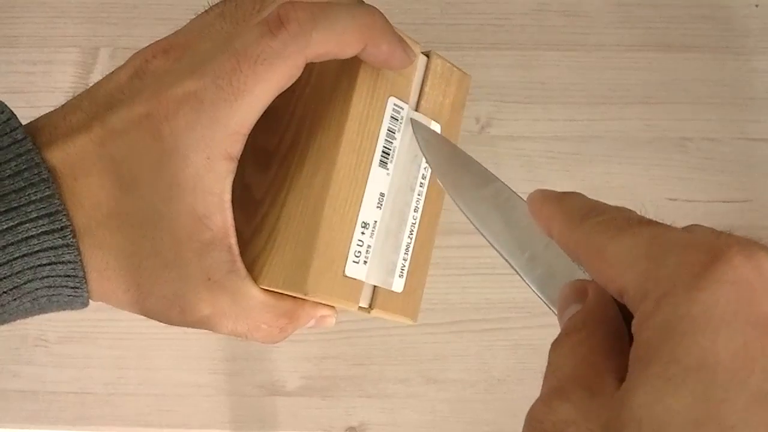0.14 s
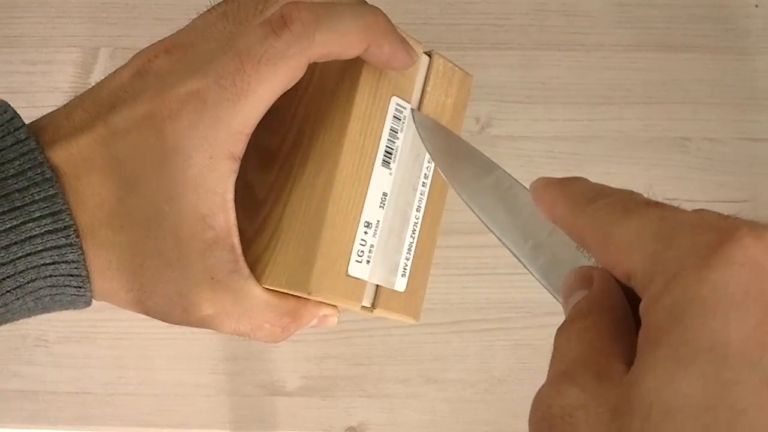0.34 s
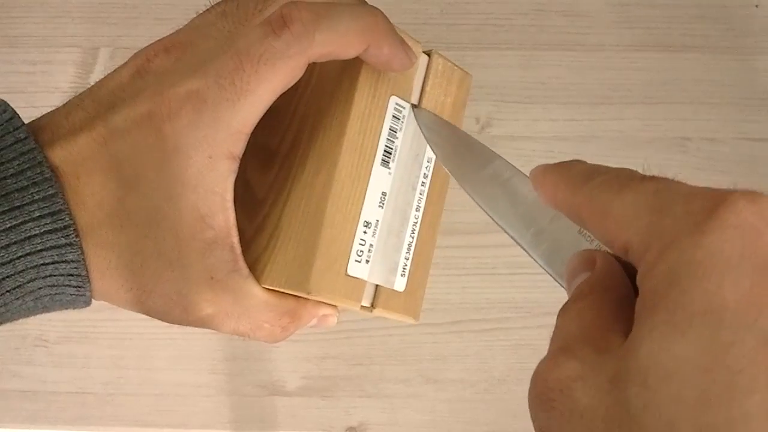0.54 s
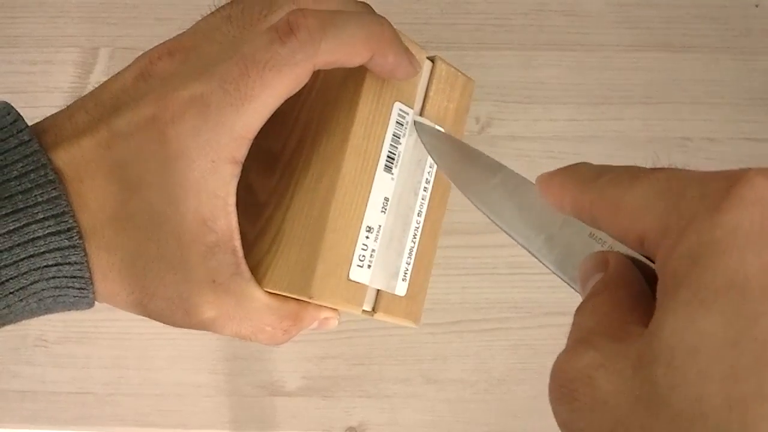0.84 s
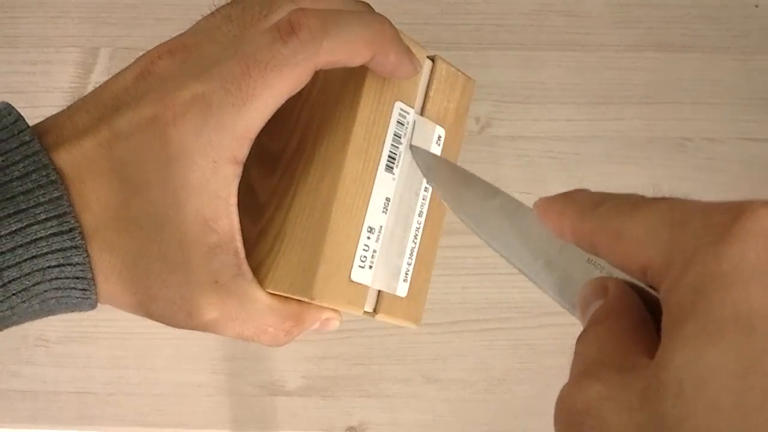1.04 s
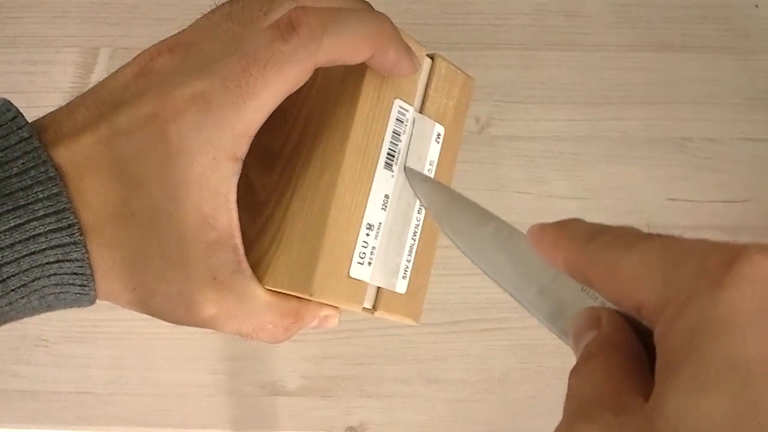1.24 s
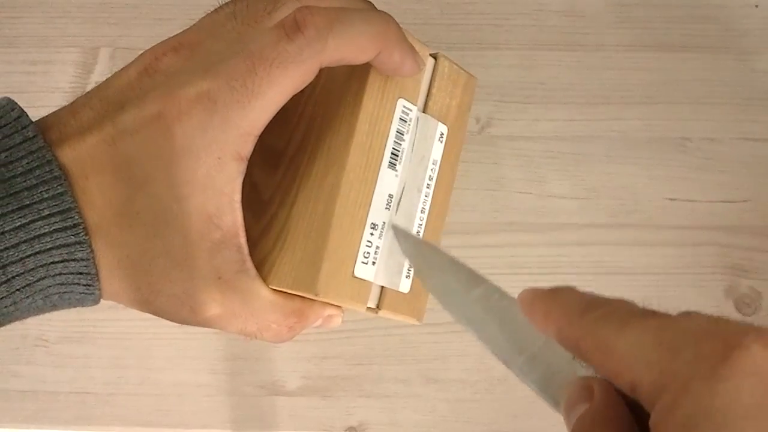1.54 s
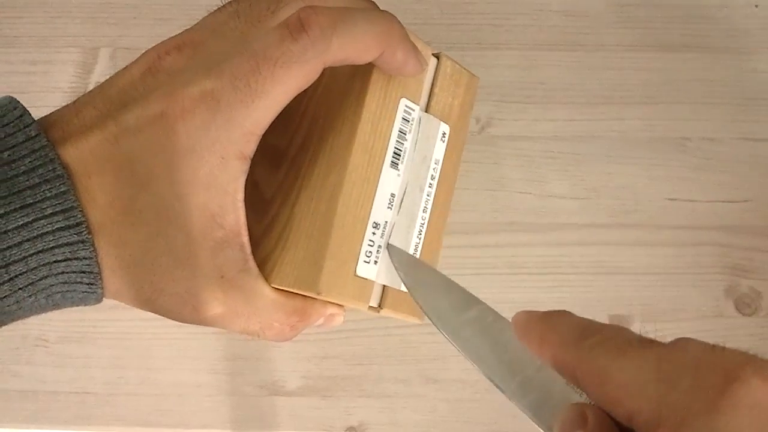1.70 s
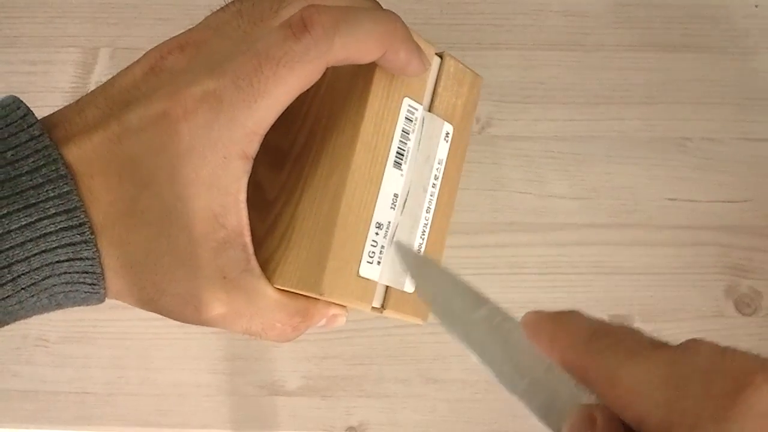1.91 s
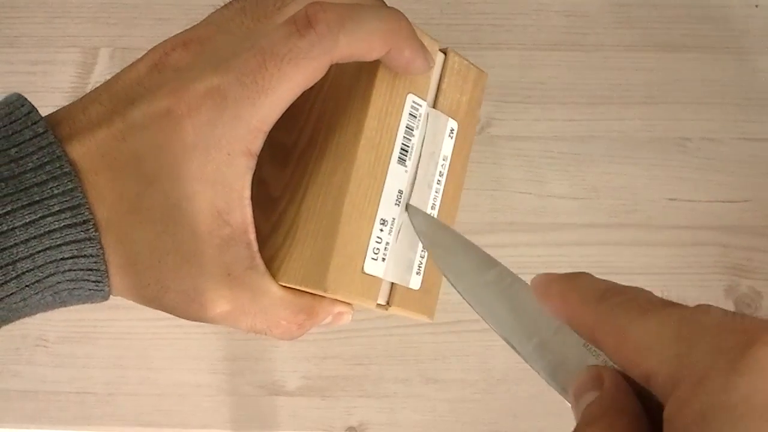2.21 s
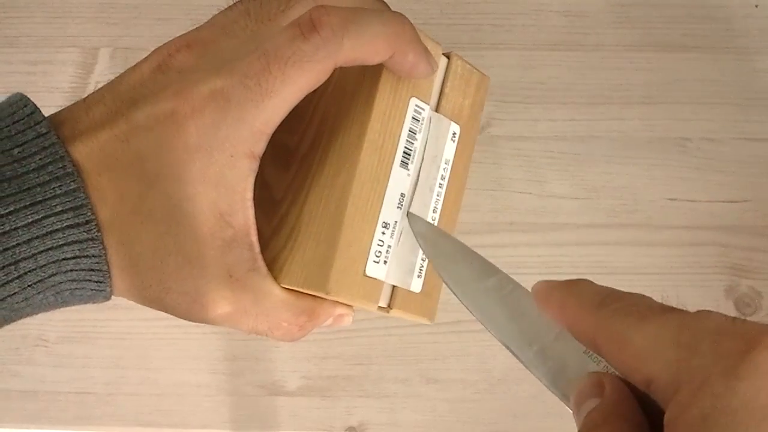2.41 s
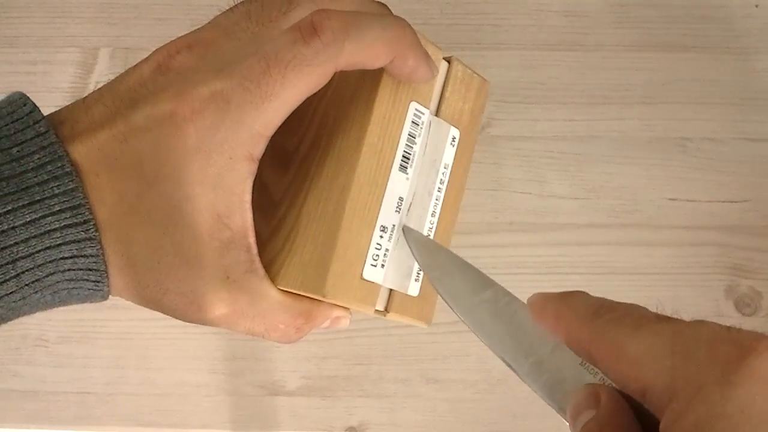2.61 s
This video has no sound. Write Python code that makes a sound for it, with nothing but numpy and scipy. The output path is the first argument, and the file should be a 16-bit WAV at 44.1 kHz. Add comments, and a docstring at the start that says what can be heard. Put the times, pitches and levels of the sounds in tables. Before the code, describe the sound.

A knife cuts the paper seal of a small cardboard box. Its tip ticks sharply near 0.3 and 0.7 seconds, pierces at 0.9, then slits the seam with a fibrous rasp until 1.6, as the box thuds and rumbles on the table. From 1.7 come short scratches and a flap's rustle, with last ticks and thuds near 2.3 and 2.6. A low hum runs steadily in the small room.

```python
"""The tip of a kitchen knife ticks against the paper seal of a small cardboard box, catching and snapping free.
Near 0.9 s it pierces the seal, then slits the seam in a rasp of tearing fibres, while the hand-held
box thuds and rumbles on the table. From 1.7 s come short scratches, the rustle of the loosened flap
and a few last ticks and thuds. A small room answers the blade, over a steady low hum."""
import sys
import numpy as np
from scipy import signal
from scipy.fft import rfft, irfft, next_fast_len
from scipy.io import wavfile
from scipy.ndimage import map_coordinates

SR = 44100
rng = np.random.default_rng(int(sys.argv[2]) if len(sys.argv) > 2 else 0)


def store_pcm(level_fs):
    """Save levels as 16-bit WAV."""
    pcm = np.round(np.clip(level_fs, -1, 1) * 32767).astype(np.int16)
    wavfile.write(sys.argv[1], SR, np.atleast_2d(pcm).T)


N = 121275
T = np.arange(N) / SR
FFT_SIZE = next_fast_len(N + SR // 2)
HZ = np.fft.rfftfreq(FFT_SIZE, 1 / SR)

# Resonances where the steel tip meets paper: (frequency [Hz], relative level [dB])
TIP_SPECTRUM = [(1500, -37.5), (3000, -21.5), (3650, -17), (4100, -10), (4500, -2), (4950, 2.5),
                (5350, -10), (5650, -4), (6000, -16), (6450, -22), (6900, -15), (8000, -41.5),
                (9000, -29.5), (9700, -37), (10400, -42), (11500, -71), (14000, -110)]
# Midrange body of the cardboard: (frequency [Hz], relative level [dB])
CARDBOARD_SPECTRUM = [(150, -45.5), (300, -8), (400, 1), (480, 3), (570, -4), (720, 3.5), (850, -1),
                      (1000, 9), (1230, -8), (1400, -2), (1750, -4.5), (2050, 0), (2650, -8.5), (3150, 1.5),
                      (3420, -1), (3750, 5), (4500, -53), (8000, -46)]
# Bright sizzle on top of ticks and cuts: (frequency [Hz], relative level [dB])
SIZZLE_SPECTRUM = [(3000, -65), (5500, 5.5), (6400, -5.5), (7000, 11), (7950, -22.5), (8900, -1),
                   (9700, -25), (10300, -11), (11000, -31), (12000, -44.5)]


def amp(db):
    """Decibels to gain."""
    return 10 ** (np.asarray(db) / 20)


def unit_rms(x):
    """Scale to rms 1."""
    return x / np.sqrt(np.mean(np.abs(x) ** 2) + 1e-20)


def log_interp(points, hz):
    """Read a curve of (Hz, value) points along a log frequency axis."""
    freqs, values = np.transpose(points)
    return np.interp(np.log(hz + 1), np.log(freqs + 1), values)


def envelopes(rows, fade_s=0.0099):
    """One gain curve for each dB column, fading out beyond the first and last time."""
    times, *columns = np.transpose(rows)
    outside_s = np.maximum(0, np.maximum(times[0] - T, T - times[-1]))
    fade = np.exp(-(outside_s / fade_s) ** 2)
    return [amp(np.interp(T, times, db)) * fade for db in columns]


def wobble(knots_per_s):
    """A smooth random curve."""
    return map_coordinates(rng.standard_normal(N // 20), [T * knots_per_s], mode="wrap")


def filtered(x, response):
    """Pass x through a frequency response."""
    return irfft(rfft(x, FFT_SIZE) * response, FFT_SIZE)[:N]


def colour(spectrum):
    """Minimum-phase response of unit power, shaped by (Hz, dB) points."""
    cepstrum = irfft(np.log(amp(log_interp(spectrum, HZ))), FFT_SIZE)
    cepstrum[1:FFT_SIZE // 2] *= 2
    cepstrum[FFT_SIZE // 2 + 1:] = 0
    return unit_rms(np.exp(rfft(cepstrum)))


def noise(spectrum):
    """Coloured noise, rms near 1."""
    return filtered(rng.standard_normal(N), colour(spectrum))


def fibre_breaks(per_s=6500, spread_db=0.5):
    """Paper tears as a dense train of tiny breaks of uneven size, rms 1."""
    breaks = rng.random(N) < per_s / SR
    polarity = rng.choice([-1, 1], N)
    size = amp(-spread_db * np.clip(rng.standard_normal(N), -2, 2))
    return unit_rms(breaks * polarity * size)


def knife_ticks():
    """The tip catches and snaps free: three quick snaps and a crumble of fibres giving way."""
    # One tick a row: (time [s], tip [dB], cardboard [dB], sizzle [dB], tip resonance [Hz],
    # resonance sharpness [factor], snap gap [s], second snap [dB re first], crumble [dB re first snap])
    ticks = [(.040, -53.5, -58.5, -84, 4400, 0.69, .0012, -21, -3.5),
             (.2545, -39.5, -69, -49, 5000, 0.88, .0013, -3, -1.5),
             (.670, -39, -56.5, -50, 4500, 0.63, .0018, -12, 3),
             (0.9173, -44.5, -38.5, -61, 4460, 0.83, .00135, -3, -3),
             (1.060, -36, -63, -51, 4990, 0.92, .0014, 3, -8),
             (1.317, -44.5, -53, -70, 4810, 0.87, .002, -10, -1),
             (1.6641, -39.5, -50.5, -75, 4630, 1, .0018, -5, 22),
             (2.316, -79, -62, -80, 4650, 0.92, 0.0034, -0.5, 0),
             (2.558, -47.5, -55, -85, 4630, 1, .0012, -8, -2)]
    tip_reference_hz, crumble_t60_s, third_snap_drop_db = 4712, 0.035, 17.5
    hold_s = 0.0022  # a tick carries the energy of its level held this long
    cardboard, sizzle = colour(CARDBOARD_SPECTRUM), colour(SIZZLE_SPECTRUM)
    out = np.zeros(N)
    for start, tip_db, card_db, sizzle_db, tip_hz, sharpness, gap, second_db, crumble_db in ticks:
        crumble = fibre_breaks() * (T >= start) * amp(-60 * np.abs(T - start) / crumble_t60_s)
        force = amp(crumble_db) * crumble / np.linalg.norm(crumble)
        for k, snap_db in enumerate([0, second_db, second_db - third_snap_drop_db]):
            force[round((start + k * gap) * SR)] += amp(snap_db)
        force *= np.sqrt(hold_s * SR) / np.linalg.norm(force)
        # How the tip sits in the paper shifts and damps its resonances.
        tip = colour([(hz * tip_hz / tip_reference_hz, db * sharpness) for hz, db in TIP_SPECTRUM])
        tick = filtered(force, amp(tip_db) * tip + amp(card_db) * cardboard + amp(sizzle_db) * sizzle)
        out += tick + room_tail(tick)
    return out


def knife_cuts():
    """The long slit and the short scratches: fibres tear while the blade's drag catches and eases."""
    # The long stroke along the seam: (time [s], tip rasp [dB], cardboard [dB])
    slit = [(1.035, -98, -89), (1.055, -60, -60.5), (1.095, -57.5, -60.5), (1.122, -53.5, -61.5),
            (1.165, -54.5, -62.5), (1.21, -58, -67.5), (1.29, -54.5, -61.5), (1.37, -57, -60.5),
            (1.405, -54, -58.5), (1.45, -56.5, -60.5), (1.53, -52, -55), (1.58, -52, -55.5),
            (1.602, -53, -53.5), (1.625, -81, -100), (1.66, -71, -62), (1.68, -98, -71)]
    # Short scratches: (peak time [s], tip [dB], cardboard [dB], sizzle [dB], flap [dB],
    # rise [s], fall [s])
    scratches = [(.268, -48.5, -79, -64, -85, 0.0076, 0.0057), (.39, -69, -79, -91, -92, 0.041, .08),
                 (.917, -47, -65, -68, -64, 0.0073, 0.025), (1.06, -61.5, -62.5, -74, -60.5, 0.031, 0.26),
                 (1.666, -42.5, -52, -74, -61, 0.0034, 0.012), (1.677, -45, -54.5, -75, -54, 0.0059, 0.089),
                 (1.704, -49, -52, -47.5, -54, 0.014, 0.012),
                 (1.815, -48.5, -60, -53.5, -52.5, 0.029, 0.014),
                 (2.038, -59, -75, -80, -66.5, 0.037, 0.011), (2.302, -54.5, -72, -67, -81, .012, .025),
                 (2.559, -59.5, -66.5, -79, -64, 0.015, 0.049), (2.74, -71, -84, -84, -83, 0.13, 0.09)]
    # Rustle of the loosened flap: (frequency [Hz], relative level [dB])
    flap_spectrum = [(1200, -15), (1800, -8), (2150, -2.5), (2600, -6), (3100, -13.5), (4500, -38.5)]
    sizzle_re_tip_db, peak_rounding = -22.5, 0.15
    catches_per_s, catch_db = 148.6, 3.5
    tip, cardboard = envelopes(slit)
    levels = np.array([tip, cardboard, tip * amp(sizzle_re_tip_db), np.zeros(N)])
    for peak_s, *peak_dbs, rise, fall in scratches:
        from_peak = np.maximum((peak_s - T) / rise, (T - peak_s) / fall)
        swell = amp(-40 * (np.hypot(from_peak, peak_rounding) - peak_rounding))
        levels += np.outer(amp(peak_dbs), swell)
    drag = unit_rms(amp(catch_db * np.clip(wobble(catches_per_s), -2, 1)))
    spectra = TIP_SPECTRUM, CARDBOARD_SPECTRUM, SIZZLE_SPECTRUM, flap_spectrum
    return sum(filtered(level * drag * fibre_breaks(), colour(spectrum))
               for level, spectrum in zip(levels, spectra))


def box_thuds():
    """Pushed against the table, the box gives soft thuds and a hollow ring."""
    # Pushes on the box: (time [s], thud level [dB], thud pitch [Hz], ring level [dB])
    pushes = [(.63, -39, 77.1, -81), (0.673, -40.5, 84.4, -54), (0.786, -34.5, 62.2, -58),
              (.865, -35.5, 58.3, -75), (0.916, -27.5, 101, -37), (1.163, -30.5, 79.8, -45.5),
              (1.324, -32, 75, -46), (1.388, -31, 109, -40), (1.513, -28.5, 108, -37.5),
              (1.683, -29.5, 103.6, -39.5), (1.712, -25.5, 81.7, -40.5), (1.814, -71, 90, -45.5),
              (2.059, -43, 87.5, -51), (2.319, -22.5, 90, -41.5), (2.564, -36.5, 103.7, -41.5)]
    # Modes of the hollow box: (frequency [Hz], relative level [dB], t60 [s])
    modes = [(198.75, 3.5, 0.17), (226.6, -9.5, 0.16), (280.3, -18.5, 0.16), (389.8, -22.5, 0.18)]
    thud_rise_s, thud_tightness, ring_rise_s = 0.025, 4.1, 0.012
    out = np.zeros(N)
    for start, thud_db, thud_hz, ring_db in pushes:
        age = np.maximum(T - start, 0)
        progress = age / thud_rise_s
        swell = (progress * np.exp(1 - progress)) ** thud_tightness
        out += amp(thud_db) * swell * np.sin(2 * np.pi * thud_hz * age)
        ring = sum(amp(db - 60 * age / t60) * np.sin(2 * np.pi * hz * age) for hz, db, t60 in modes)
        out += 2 * amp(ring_db) * (1 - np.exp(-age / ring_rise_s)) * ring
    return out


def box_rumble():
    """The box rumbles as the blade drags, and its hollow hums under the shifting fingers."""
    # Swell of the rumble under the blade: (time [s], level [dB])
    drag = [(.9, -45), (1.05, -43.5), (1.15, -43), (1.28, -43), (1.38, -38), (1.55, -40), (1.63, -42.5),
            (1.78, -53), (1.9, -50.5)]
    # Low weight of that rumble: (frequency [Hz], relative level [dB])
    rumble_spectrum = [(25, -36), (50, 10.5), (76, -4), (115, 13), (145, -9), (200, -32.5), (310, -38),
                       (600, -69)]
    # Swell of the hollow under fingers and blade: (time [s], level [dB])
    handling = [(0, -58.5), (.15, -68.5), (.27, -56), (.45, -68.5), (.58, -64), (.85, -67.5), (1.1, -54.5),
                (1.3, -57.5), (1.53, -47.5), (1.62, -46), (1.8, -59), (1.93, -91), (2.08, -49.5),
                (2.25, -86.5), (2.45, -75.5), (2.54, -54), (2.66, -87), (2.75, -52)]
    # Boxy tone of the hollow: (frequency [Hz], relative level [dB])
    hollow_spectrum = [(100, -48.5), (170, -20), (190, -6), (203, 6), (220, -8), (245, -26), (310, -34.5),
                       (400, -25.5), (500, -36.5), (900, -66.5)]
    rumble = envelopes(drag)[0] * noise(rumble_spectrum)
    hollow = envelopes(handling)[0] * noise(hollow_spectrum)
    return rumble + hollow


def room_tail(x, level_db=-7, predelay_s=0.006):
    """The small room's short answer to x; each frequency dies at its own speed."""
    # Decay of the room: (frequency [Hz], t60 [s])
    decay_times = [(200, 0.18), (1500, 0.2), (5000, 0.26), (10000, 0.18)]
    hz, t, grains = signal.stft(rng.standard_normal(SR // 2), SR, nperseg=256)
    decay = amp(-60 * t / log_interp(decay_times, hz)[:, None])
    tail = signal.istft(grains * decay, SR, nperseg=256)[1]
    response = rfft(tail / np.linalg.norm(tail), FFT_SIZE)
    predelay = np.exp(-2j * np.pi * HZ * predelay_s)
    return amp(level_db) * filtered(x, response * predelay)


def room_tone(waver_db=4, drift_rad=0.9, air_db=-52):
    """A slightly wavering appliance hum over faint room noise."""
    # Partials of the hum: (frequency [Hz], level [dB])
    partials = [(90.5, -56), (150.7, -73), (269.5, -76.5), (376.8, -94)]
    # Bass-heavy room noise: (frequency [Hz], relative level [dB])
    air_spectrum = [(15, -7.5), (30, -6.5), (48, -6), (75, 3), (112, -0.5), (135, -20.5), (170, -34),
                    (202, -14), (235, -26), (313, -36), (375, -28.5), (455, -35.5), (700, -38), (1300, -39),
                    (3400, -37), (4800, -36), (6000, -38), (7000, -46.5), (8000, -62.5), (9300, -54.5),
                    (11000, -91)]
    hum = np.zeros(N)
    for hz, db in partials:
        rms = amp(db + waver_db * wobble(6.705))
        phase = 2 * np.pi * hz * T + drift_rad * wobble(7.3)
        hum += rms * np.sqrt(2) * np.sin(phase)
    return hum + amp(air_db) * noise(air_spectrum)


def scene():
    """Knife, box and room, mixed in mono."""
    cuts = knife_cuts()
    knife = knife_ticks() + cuts + room_tail(cuts)
    return (knife + box_thuds() + box_rumble() + room_tone())[None]


def record(dry, cutoff_hz=11500, dc_offset=-0.0045):
    """A steep high cut and a slight DC offset."""
    high_cut = 1 / (1 + (HZ / cutoff_hz) ** 60)
    return np.array([filtered(channel, high_cut) for channel in dry]) + dc_offset


dry = scene()
out = record(dry)
store_pcm(out)
```